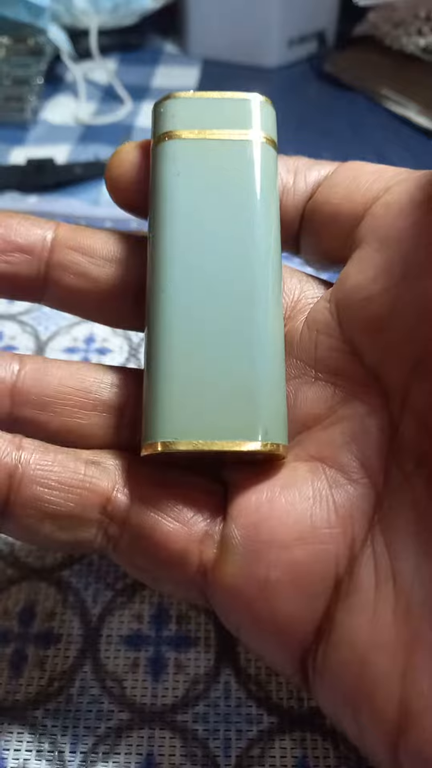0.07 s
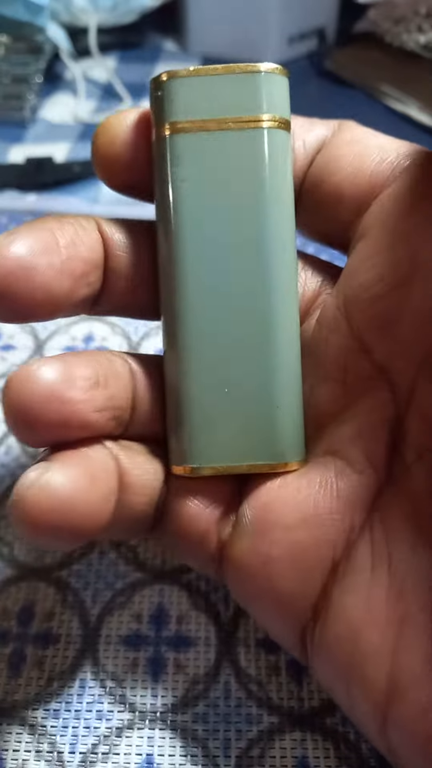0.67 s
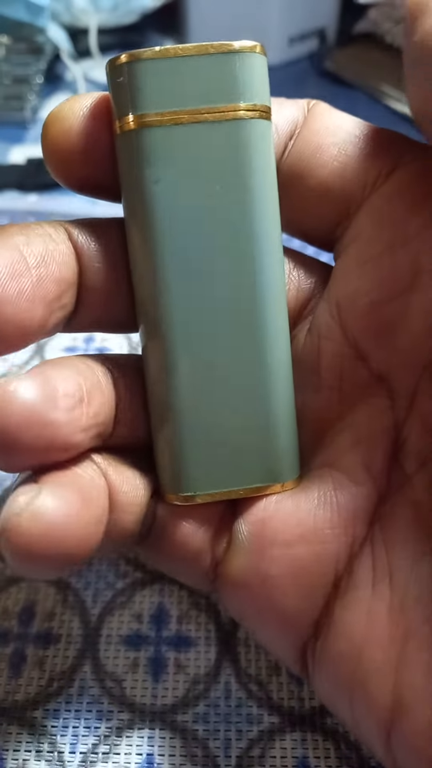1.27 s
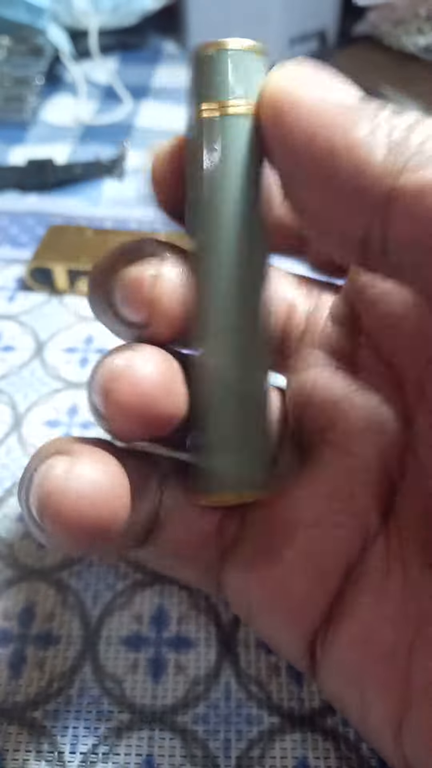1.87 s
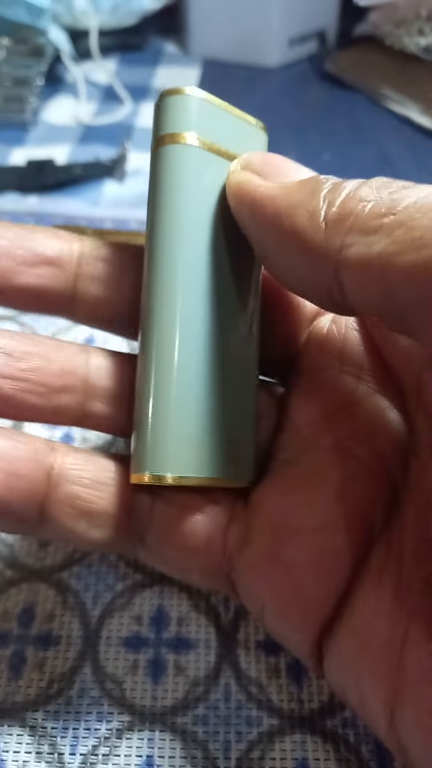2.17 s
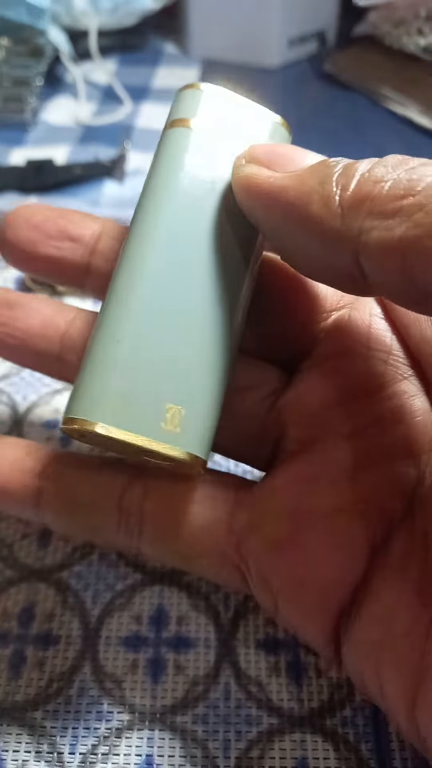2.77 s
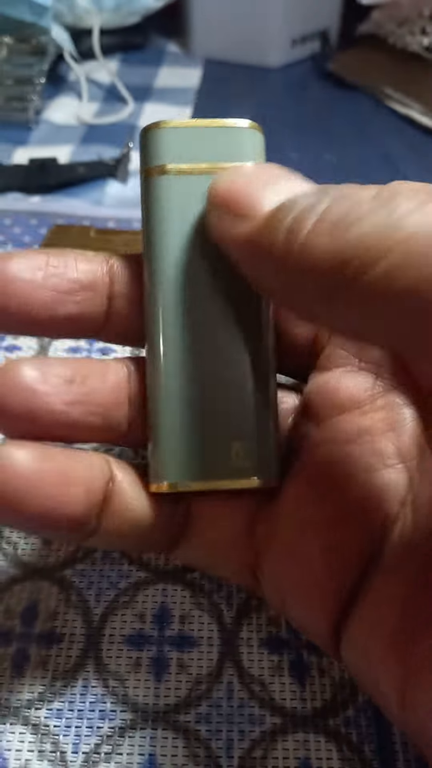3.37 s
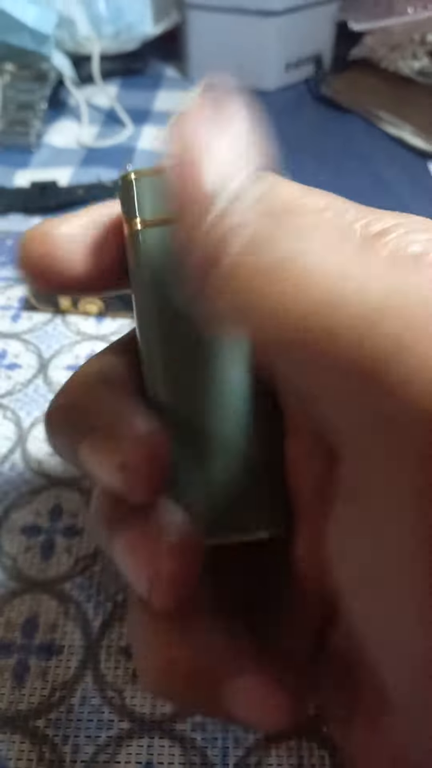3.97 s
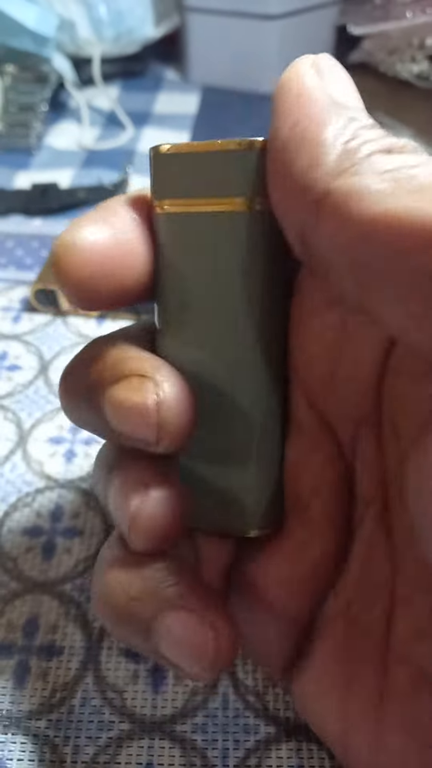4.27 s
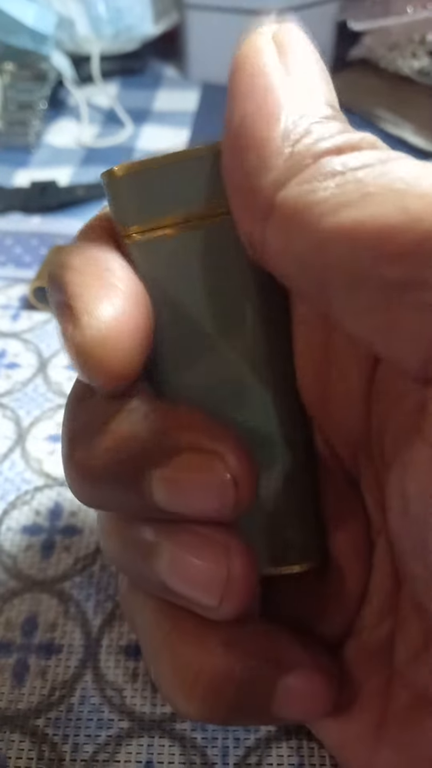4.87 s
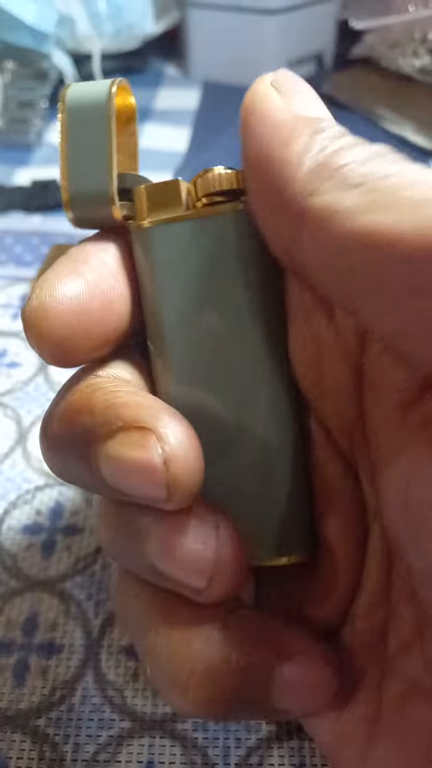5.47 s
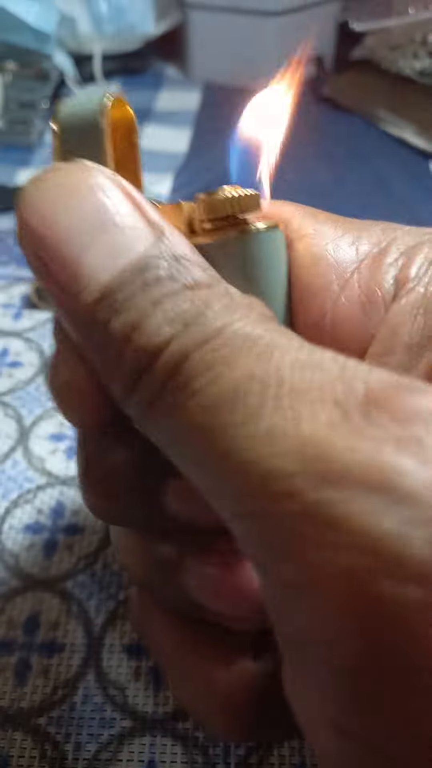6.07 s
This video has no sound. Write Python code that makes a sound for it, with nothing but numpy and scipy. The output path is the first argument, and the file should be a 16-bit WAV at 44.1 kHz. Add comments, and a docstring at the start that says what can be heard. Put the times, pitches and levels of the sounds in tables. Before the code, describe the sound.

In a quiet small room, fingers brush very faintly over a smooth metal lighter, with a few tiny skin squeaks. Near the end the sprung lid flips open with a sharp, bright click and a brief ring. About a second later the flint wheel is struck once, a short squeaky rasp with a soft low thump as the gas catches. The microphone is close, over low steady room noise.

```python
"""Metal lighter, opened and struck

Close up in a quiet room, a hand turns the lighter; skin brushes the lacquered case.
The sprung lid flips open and chatters against its stop, leaving a faint ring.
The thumb spins the flint wheel: a squeal, a rasp, a low thump as the thumb lands and the gas catches."""
import sys
import numpy as np
from scipy import signal
from scipy.fft import rfft, irfft
from scipy.io import wavfile
from scipy.ndimage import uniform_filter1d

SR = 44100
rng = np.random.default_rng(int(sys.argv[2]) if len(sys.argv) > 2 else 0)


def wav_out(sig):
    """Save sig, one row per channel (or a flat mono array), as 16-bit PCM at SR to the path in sys.argv[1]."""
    wavfile.write(sys.argv[1], SR, np.round(np.clip(np.atleast_2d(sig).T, -1, 1) * 32767).astype(np.int16))


N = 269451
TIME_S = np.arange(N) / SR
# flint stroke: (wheel breaks free [s], grind length [s])
FLINT_STROKE = [(5.7335, 0.00465)]


def lid(cam_db=-30.5, ring_db=-35):
    """The cam scrapes over, the lid chatters on its stop; the hardest blow sets the metal ringing."""
    # lid and cam hitting the case: (time [s], level [dB], pan L-R [dB])
    blows = [(4.853, -36.5, 12.5), (4.859, -14.5, 8), (4.8618, -15.5, -0.5), (4.8662, -19, -2.5),
             (4.869, -16.5, 0.5)]
    # case response: (frequency [Hz], left gain [dB], right gain [dB])
    case_eq = [(453, -31, -29), (580, -21.5, -21.5), (990, -14.5, -19), (1210, -22.5, -17),
               (1646, -7.5, -13.5), (2700, -7, -8.5), (3560, -1, -9), (4040, 5, -15), (6655, -25.5, -26),
               (8200, -18, -7.5), (10400, -1, -16.5), (11400, -17, -14), (12300, -9, -1), (14900, -13, -15)]
    # open lid and case: (frequency [Hz], level re ring_db [dB], T60 [s])
    modes = [(2317, -4, 0.12), (2620, 0.5, 0.081), (3190, -5, 0.15), (4380, 8.5, 0.047), (4470, 3, 0.073),
             (4700, -7, .13), (5400, -12.5, .13), (7945, -7.5, 0.12), (8300, -13.5, 0.26), (9400, -3, .08),
             (10100, -2, .07), (12640, 0, 0.066), (13290, -5, .12), (14820, -8.5, .08)]
    hardest_s = max(blows, key=lambda row: row[1])[0]
    cam_env = amp(cam_db) * swell(hardest_s, rise_s=0.002, fall_s=0.0042)
    cam = cam_env * pan(4) * rng.standard_normal((2, N))
    out = colour(cam + contacts(blows, decay_s=0.0019), case_eq)
    t = np.arange(SR) / SR
    for hz, db, t60_s in modes:
        tone = np.sin(2 * np.pi * (hz * t + rng.random((2, 1))))
        add(out, hardest_s, amp(ring_db + db - 60 * t / t60_s) * tone)
    return out


def wheel(grind_db=-27.5, coast_db=-39, coast_delay_s=0.022):
    """The wheel breaks free, tears grains off the flint and coasts to a stop, lightly loaded."""
    # teeth snapping off the flint: (time [s], level [dB], pan L-R [dB])
    snaps = [(5.7332, -24.5, -7), (5.7349, -20, 2), (5.7383, -10, 24), (5.7432, -43, -3), (5.759, -32, 13),
             (5.760, -25.5, -10)]
    # wheel and flint response: (frequency [Hz], left gain [dB], right gain [dB])
    flint_eq = [(453, -12, -12.5), (635, -9.5, -8), (1140, -26, -16.5), (2200, -9.5, -8.5),
                (2890, -3.5, -8.5), (3400, -5, -11), (3970, 0, -10.5), (5640, -16, -22), (6660, -17, -20),
                (9200, -9, -13.5), (12300, -6.5, -10.5), (15100, -11, -12.5)]
    start_s, length_s = FLINT_STROKE[0]
    grind = amp(grind_db) * swell(start_s, rise_s=0.0032, fall_s=0.0012, hold_s=length_s)
    coast = amp(coast_db) * swell(start_s + coast_delay_s, rise_s=0.011, fall_s=0.012)
    coast *= TIME_S > start_s
    grit = unit(flutter(depth_db=3, samples=24) * rng.standard_normal((2, N)))
    rasp = grit * np.hypot(grind, coast) * pan(5)
    return colour(rasp + contacts(snaps, decay_s=0.00018, crack_share=0.8), flint_eq)


def squeal(level_db=-32):
    """Under the thumb's growing load the wheel sticks and slips unevenly in its own resonances."""
    # wheel resonances: (frequency [Hz], width [Hz], relative level [dB])
    modes = [(2420, 840, -13), (3910, 430, -9), (4230, 480, -5)]
    start_s, length_s = FLINT_STROKE[0]
    voice = sum(amp(db) * friction_band(hz, width_hz) for hz, width_hz, db in modes)
    slips = flutter(depth_db=3, samples=160)
    env = swell(start_s + length_s, rise_s=0.0094, fall_s=0.0015)
    return amp(level_db) * unit(voice * slips) * env * pan(7)


def thumps():
    """Pushes of air and jolts of the hand swell and die in a few cycles."""
    # air pushed by the swinging lid and the catching gas:
    # (time [s], peak [dB], frequency [Hz], time constant [s], pan L-R [dB])
    puffs = [(4.855, -39.5, 81.4, 0.0079, 6.5), (5.7319, -25.5, 75.4, 0.0052, -18.5)]
    # lid recoil and landing thumb: (time [s], level [dB], time constant [s], pan L-R [dB])
    knocks = [(4.8634, -48.5, 0.0042, 1.5), (5.757, -37, 0.0023, 8)]
    # hand resonances: (frequency [Hz], gain [dB], time constant stretch [ratio])
    hand_modes = [(149, -4, 1.9), (250.4, 1.5, 1)]
    jolts = [(at_s, db + gain_db, hz, tau_s * stretch, pan_db)
             for at_s, db, tau_s, pan_db in knocks for hz, gain_db, stretch in hand_modes]
    out, t = np.zeros((2, N)), np.arange(SR // 4) / SR
    for at_s, db, hz, tau_s, pan_db in puffs + jolts:
        env = (t / tau_s / 2) ** 2 * np.exp(2 - t / tau_s)
        add(out, at_s, -amp(db) * pan(pan_db) * env * np.sin(2 * np.pi * hz * t))
    return out


def ticks():
    """Light contacts in the hinge and wheel."""
    # contacts: (time [s], level [dB], pan L-R [dB])
    hits = [(4.7198, -50.5, 1.5), (4.7355, -72.5, -0.5), (4.784, -77.5, 1), (5.0424, -57, -8),
            (5.6084, -72.5, -0.5), (5.6724, -72.5, 8), (5.8724, -55, 3)]
    # tick spectrum: (frequency [Hz], gain [dB])
    tick_eq = [(1000, -27.5), (3200, -18), (4400, -10.5), (6300, -17), (8300, -0.5), (11000, -9.5),
               (12600, 2), (15500, -3.5)]
    return colour(contacts(hits, decay_s=0.001), tick_eq)


def fingers(fall_ratio=0.9):
    """Dry skin hisses over the lacquer stroke by stroke and squeaks where it grips."""
    # slides on the case: (peak time [s], level [dB], rise time constant [s])
    strokes = [(1.401, -70.5, 0.015), (1.51, -83, 0.14), (1.704, -75, .04), (1.90, -90, 0.083),
               (3.468, -80.5, 0.035), (3.595, -83.5, 0.091), (3.89, -85.5, 0.099), (4.755, -78.5, .035)]
    # skin friction spectrum: (frequency [Hz], gain [dB])
    skin_eq = [(2000, -14), (3600, -6.5), (5500, -11.5), (7700, 2), (9200, 0.5), (12000, 1.5), (14000, -2),
               (15800, -6.5)]
    # fingertip grips: (time [s], level [dB], frequency [Hz], width [Hz], 1/e half length [s])
    squeaks = [(1.395, -68.5, 13700, 2200, 0.016), (1.702, -69.5, 7700, 750, 0.017),
               (3.54, -79.5, 6800, 700, 0.01)]
    hiss = unit(flutter(depth_db=2, samples=150) * rng.standard_normal((2, N)))
    envs = [amp(db) * swell(at_s, rise_s, fall_ratio * rise_s) for at_s, db, rise_s in strokes]
    out = colour(hiss * np.linalg.norm(envs, axis=0), skin_eq)
    for at_s, db, hz, width_hz, half_s in squeaks:
        out += amp(db) * friction_band(hz, width_hz) * np.exp(-((TIME_S - at_s) / half_s) ** 2)
    return out


def room(x, wet_db=-12, build_s=0.005, t60_s=0.255):
    """Dense small-room reflections; each side of the source reaches both ears."""
    # room response: (frequency [Hz], gain [dB])
    room_eq = [(100, 3.5), (450, 4), (1100, -0.5), (1700, 3), (3000, -2), (4200, -5), (5500, 3.5),
               (6700, 4.5), (9000, -0.5), (12500, -3.5), (15000, -4.5)]
    t = np.arange(SR // 2) / SR
    env = amp(-60 * t / t60_s) * (1 - np.exp(-(t / build_s) ** 2))
    tail = rng.standard_normal((2, 2, len(t))) * env
    tail /= np.linalg.norm(tail, axis=2, keepdims=True)
    wet = signal.fftconvolve(x[:, None], tail, axes=2).sum(0)[:, :N] / np.sqrt(2)
    return amp(wet_db) * colour(wet, room_eq)


def air(noise_db=-66.5):
    """Steady room noise with a few resonances and a faint hum."""
    # noise floor: (frequency [Hz], relative density [dB])
    floor = [(15, -40.5), (25, -10), (59, -0.5), (86, -6.5), (148, -11.5), (169, -15.5), (246, -12.5),
             (421, -25.5), (614, -23), (684, -33), (871, -27.5), (1200, -34.5), (1450, -35), (2700, -40),
             (15500, -51)]
    # stereo likeness: (frequency [Hz], L-R correlation [ratio])
    likeness = [(60, 0.9), (150, 0.54), (380, 0.73), (950, -0.033), (2380, 0.1), (5980, -0.33),
                (15000, 0.27)]
    # resonances: (frequency [Hz], width [Hz], height over the floor [dB])
    peaks = [(264, 80, 2.5), (636, 70, 4.5), (873, 160, 5), (1433, 8.8, 15), (1746, 230, 6.5),
             (13510, 4700, 7)]
    # hum lines: (frequency [Hz], rms level [dB])
    lines = [(48.6, -77.5), (247.6, -87), (1425, -100)]
    hz = np.fft.rfftfreq(N, 1 / SR)
    left, independent = rfft(rng.standard_normal((2, N)))
    corr = np.clip(log_interp(likeness, hz), -1, 1)
    right = corr * left + np.sqrt(1 - corr ** 2) * independent
    peaks_db = sum(db / (1 + ((hz - f) / width_hz * 2) ** 2) for f, width_hz, db in peaks)
    noise = unit(irfft(np.array([left, right]) * amp(log_interp(floor, hz) + peaks_db), N))
    hum = sum(amp(db) * np.sqrt(2) * np.sin(2 * np.pi * (f * TIME_S + rng.random())) for f, db in lines)
    return amp(noise_db) * noise + hum


def contacts(hits, decay_s, crack_share=0., samples=1500):
    """One brief rattle per hit; crack_share of its energy is in a sharp first impact."""
    out, t = np.zeros((2, N)), np.arange(samples) / SR
    for at_s, db, pan_db in hits:
        rattle = np.sqrt(1 - crack_share) * rng.choice([-1., 1.], (2, samples)) * np.exp(-t / decay_s)
        rattle[:, 0] = np.sqrt(crack_share * decay_s * SR / 2)
        add(out, at_s, amp(db) * pan(pan_db) * rattle)
    return out


def friction_band(hz, width_hz):
    """Friction noise in one steep resonance."""
    detune = (np.fft.rfftfreq(N, 1 / SR) - hz) / width_hz * 2
    return unit(irfft(rfft(rng.standard_normal((2, N))) / (1 + detune ** 4), N))


def flutter(depth_db, samples):
    """Smoothed random gain, depth_db rms."""
    return amp(depth_db * unit(uniform_filter1d(rng.standard_normal(N), size=samples)))


def swell(peak_s, rise_s, fall_s, hold_s=0):
    """Exponential rise, hold, exponential fall; rise_s and fall_s are time constants."""
    return np.exp(np.minimum(TIME_S - peak_s, 0) / rise_s - np.maximum(TIME_S - peak_s - hold_s, 0) / fall_s)


def colour(x, eq, samples=2048):
    """Minimum-phase filter of unit energy; eq has one dB column, or one per side."""
    hz = abs(np.fft.fftfreq(samples, 1 / SR))
    log_gain = np.log(amp([log_interp(eq, hz), log_interp(eq, hz, column=-1)]))
    taps = np.fft.ifft(np.exp(np.conj(signal.hilbert(log_gain)))).real
    taps /= np.linalg.norm(taps, axis=1, keepdims=True)
    return signal.oaconvolve(x, taps, axes=1)[:, :N]


def log_interp(points, hz, column=1):
    """One table column over log frequency."""
    table = np.transpose(points)
    return np.interp(np.log(hz + 1), np.log(table[0] + 1), table[column])


def amp(db):
    return 10 ** (np.asarray(db) / 20)


def unit(x):
    """Scales to unit rms."""
    return x / np.sqrt(np.mean(x ** 2) + 1e-20)


def pan(db):
    """Constant-power gains for an L-R level gap."""
    return unit(amp(np.array([[db], [-db]]) / 2))


def add(mix, at_s, sound):
    part = mix[:, round(at_s * SR):][:, :sound.shape[-1]]
    part += sound[..., :part.shape[1]]


def scene():
    """The lighter in the hand, its reflections and the quiet room."""
    handling = fingers() + ticks()
    # (source, room send [dB]); the squeal under the thumb and the low thumps carry less far
    sources = [(lid(), 0), (wheel(), 0), (squeal(), -8), (thumps(), -5), (handling, 1)]
    direct = sum(sound for sound, _ in sources)
    send = sum(amp(db) * sound for sound, db in sources)
    return direct + room(send) + air()


def record(dry, low_hz=38, high_hz=15900):
    """Rumble high-pass and band limit."""
    trimmed = signal.sosfilt(signal.butter(7, low_hz, "high", fs=SR, output="sos"), dry)
    lowpass = signal.firwin(511, high_hz, window=("kaiser", 9), fs=SR)
    return signal.oaconvolve(trimmed, lowpass[None], "same", axes=1)


dry = scene()
out = record(dry)
wav_out(out)
```